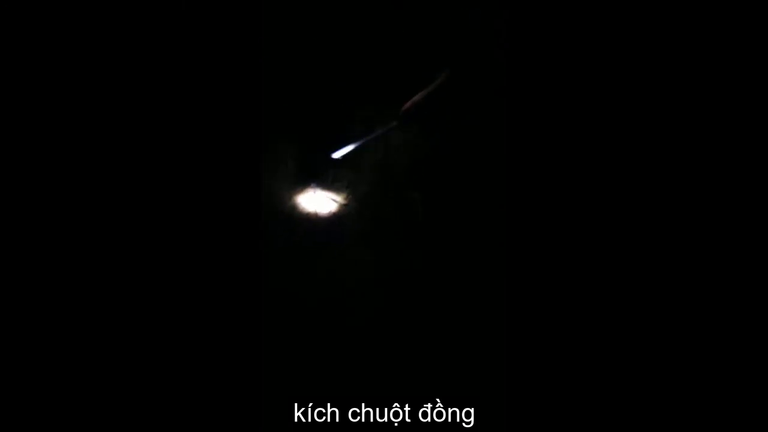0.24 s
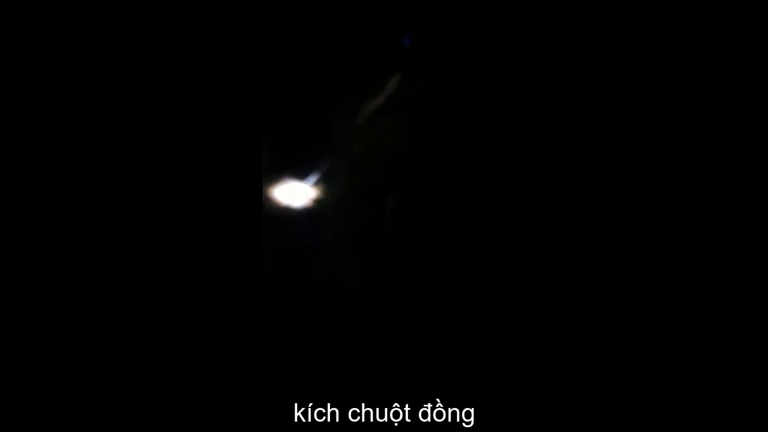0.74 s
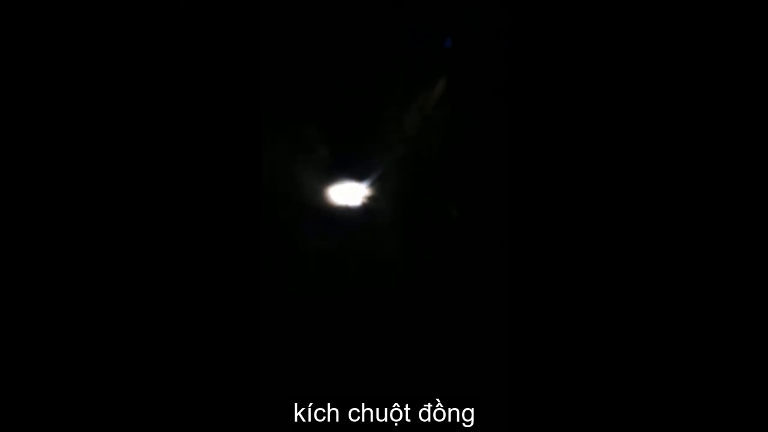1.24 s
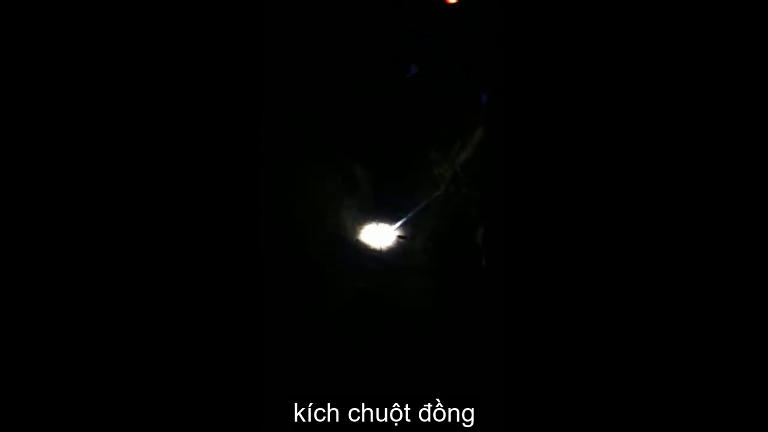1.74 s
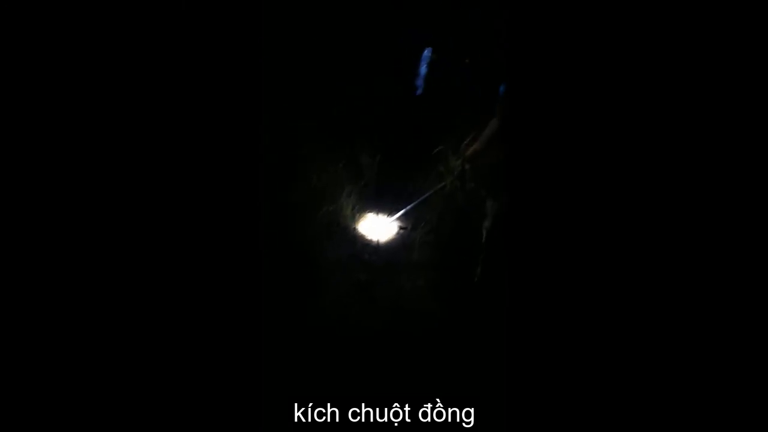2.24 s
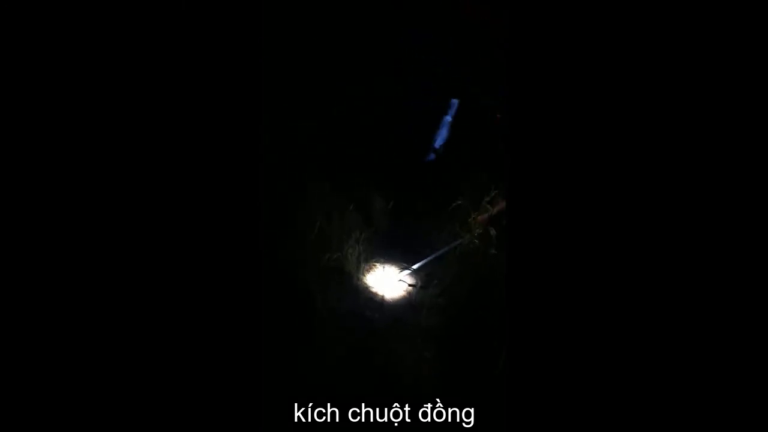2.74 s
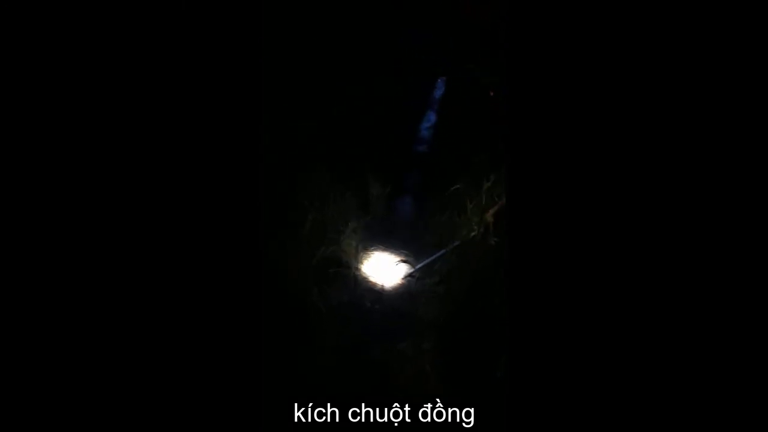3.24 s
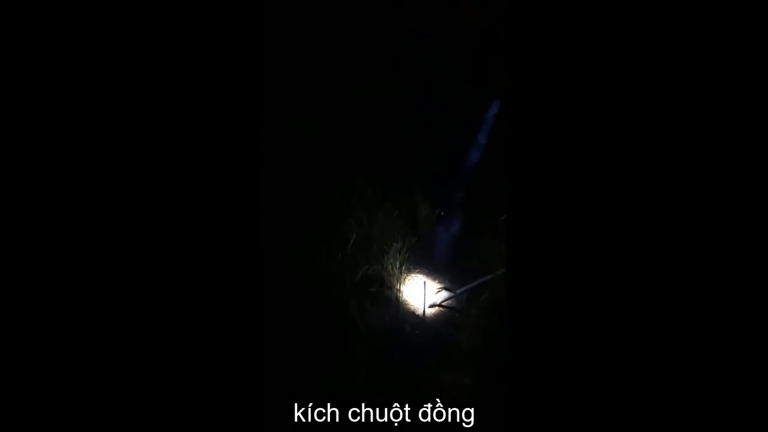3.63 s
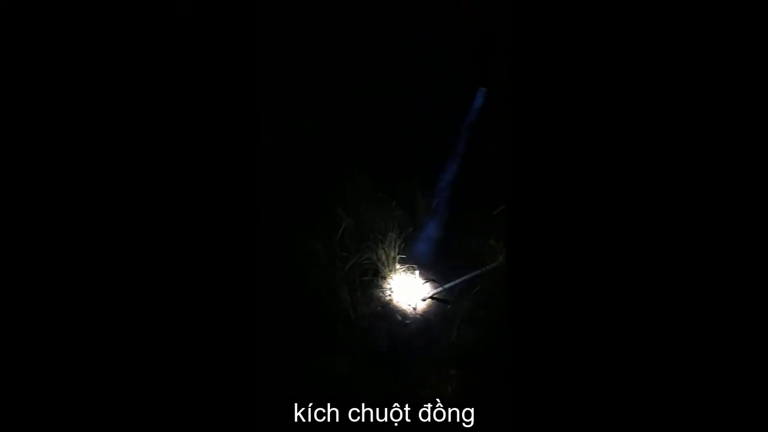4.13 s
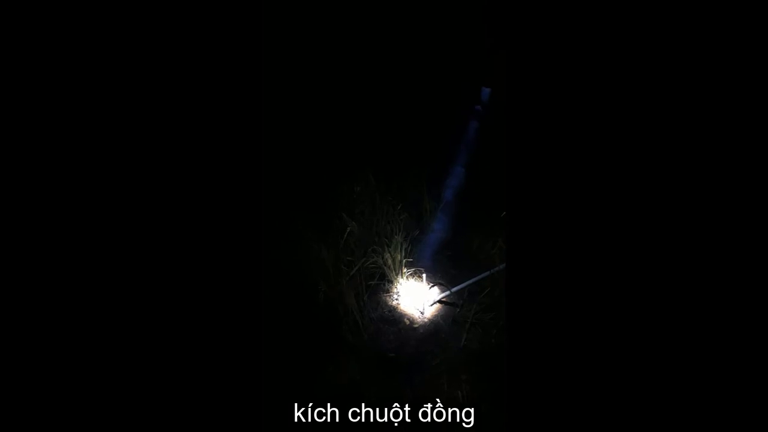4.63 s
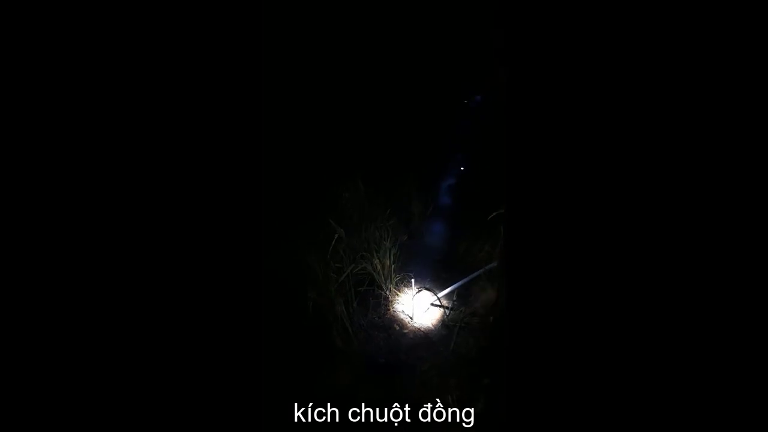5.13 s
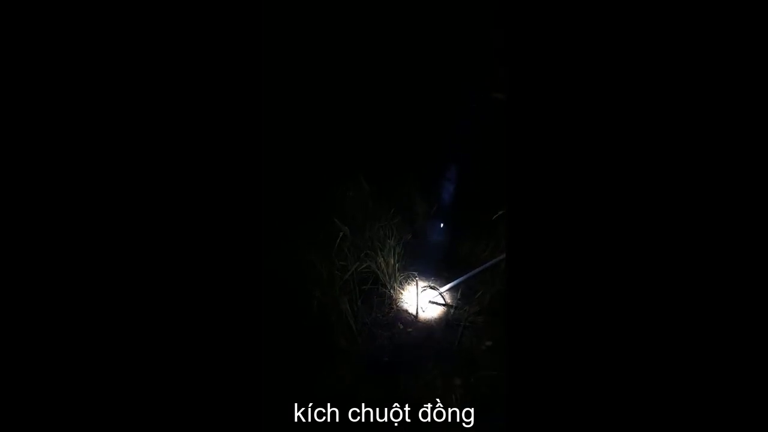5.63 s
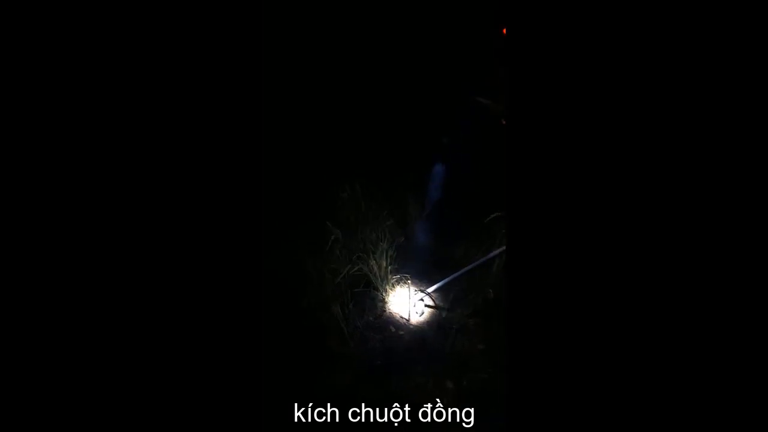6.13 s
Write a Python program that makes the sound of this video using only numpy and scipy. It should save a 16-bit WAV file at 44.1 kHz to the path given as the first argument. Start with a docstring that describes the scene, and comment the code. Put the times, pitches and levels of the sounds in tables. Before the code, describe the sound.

In an open grassy field at night, grass swishes close to the microphone as someone pushes through, with hard woody knocks and dry snaps early on and soft soil scuffs. Insects hiss steadily, small frogs rattle about five times a second and a distant engine hums faintly. Later the frogs grow clearer, and a small rodent gives one sharp, rasping squeak near the end.

```python
"""A grassy field at night. Close by, grass swishes, ticks and snaps as someone pushes through; the ground scuffs.
Near the end a small rodent gives one sharp, rasping squeak. Small frogs rattle five times a second.
A far insect chorus hisses, thin whistles curl and a distant engine hums.
Grass and soil are noise and random slips under movement envelopes; snaps and knocks are short bursts through
resonators; animals are harmonics, pulse trains and gliding sines; insects, engine and air are shaped noise."""
import sys
import numpy as np
from scipy import signal
from scipy.fft import rfft, irfft, next_fast_len
from scipy.io import wavfile
from scipy.ndimage import uniform_filter1d

SR = 44100
rng = np.random.default_rng(int(sys.argv[2]) if len(sys.argv) > 2 else 0)


def transcribe(signal):
    """Save signal, clipped to [-1, 1], as a 16-bit WAV file at the path in sys.argv[1]."""
    frames = np.atleast_2d(signal).T
    limited = np.clip(frames, -1, 1)
    pcm = np.round(limited * 32767).astype(np.int16)
    wavfile.write(sys.argv[1], SR, pcm)


N = 281029
TIME_S = np.arange(N) / SR

# Event levels are before each function's gain_db.
# Strides and smaller brushes; rise and fall span 10 dB:
# full_strength_s, hold_s, level_db, rise_s, fall_s, extra_body_db, extra_sheen_db
SWEEPS = [(0.0, .18, -35.3, .1, .7, 0, 1), (0.378, .008, -35.5, .03, .04, -4, 0),
          (0.45, .15, -46.5, .05, .15, -1, 10), (0.745, .05, -38.5, .03, .1, -2, 4),
          (0.92, .11, -31.8, .22, .115, 0, 0), (1.22, .1, -46, .04, .1, 4, 6),
          (1.5, .07, -45.3, .1, .1, 4, 4), (1.7, .15, -49, .1, .1, 3, -6),
          (1.99, .16, -42.3, .14, .1, 2, 3), (2.205, .01, -31.7, .05, .25, -4, -1),
          (2.34, .03, -42, .05, .08, 3, 2), (2.47, .03, -40, .05, .13, 1, 1),
          (2.68, .26, -49, .15, .15, 4, -2), (3.19, .06, -35.8, .18, .13, -2, 4),
          (3.4, .005, -36, .12, .14, -2.5, 2), (4.58, .035, -35.5, .085, .06, -7, -4),
          (4.72, .22, -48, .05, .2, 1, -8), (5.055, .005, -41, .05, .025, 2, -6),
          (5.33, .33, -36.7, .32, .16, -.5, -.5), (5.53, .06, -38, .04, .07, -3, -1),
          (5.85, .5, -43.5, .1, .1, -2, -3.5), (6.31, .06, -46, .04, .05, 4, -3)]
# Feet scuffing the ground: full_strength_s, hold_s, level_db, rise_s, fall_s, lowpass_hz
SCUFFS = [(0.1, .06, -62, .03, .05, 1200), (0.47, .02, -63, .03, .04, 2000), (0.9, .1, -68, .15, .06, 3000),
          (2.0, .15, -72, .2, .05, 3000), (2.22, .12, -66, .03, .05, 2000),
          (2.412, .035, -55, .005, .04, 2000), (3.17, .25, -68, .15, .06, 3000),
          (3.625, .15, -62.5, .02, .05, 750), (3.895, .005, -68, .015, .06, 800),
          (4.708, .012, -53.5, .008, .025, 4000), (4.838, .065, -58, .025, .025, 3500),
          (4.942, .06, -56.5, .02, .012, 2500), (5.048, .03, -55.5, .025, .012, 6000),
          (5.32, .06, -62.5, .12, .1, 1500), (5.58, .06, -62, .04, .06, 2000),
          (6.31, .005, -64, .012, .025, 800)]
# Thick stalks and clods breaking: start_s, peak_db, pitch_hz, ring_width_hz
KNOCKS = [(0.225, -19.5, 1320, 400), (0.596, -15.8, 1300, 270), (0.7275, -23.5, 1680, 400),
          (1.551, -35, 1300, 1500), (2.400, -35, 1100, 900), (2.4078, -20, 1270, 650),
          (2.4083, -30, 600, 500), (2.4312, -30, 1200, 1400), (2.4455, -36, 1150, 900),
          (2.4705, -39, 1250, 900), (2.9375, -31, 1650, 600), (2.96, -42, 1550, 600),
          (3.253, -36, 1300, 500), (3.266, -38, 1550, 500), (3.28, -31, 1350, 800), (3.288, -37, 1450, 500),
          (3.421, -35, 1100, 1100), (3.512, -34, 2200, 1100), (3.541, -36, 1300, 1200),
          (3.621, -45, 540, 330), (3.653, -44, 500, 330), (3.765, -50, 520, 330), (4.701, -34, 1900, 700),
          (4.7095, -37, 1100, 1400), (4.7155, -36, 1400, 1600), (4.807, -41, 1700, 600),
          (4.84, -36, 2210, 350), (4.867, -38, 2210, 500), (4.889, -39, 1140, 600), (4.935, -40, 2200, 900),
          (5.025, -39, 1480, 700), (5.055, -31, 1750, 900), (5.059, -32, 1450, 1300),
          (5.359, -45, 650, 330), (5.593, -45, 580, 330)]
# Loudest dry blades snapping: start_s, first_millisecond_db, pitch_hz, splinter_s, lowpass_hz
SNAPS = [(0.034, -19, 7200, .001, 9000), (0.226, -26.5, 4200, .002, 8000), (0.5965, -33, 3500, .001, 8000),
         (0.728, -30, 3000, .002, 9000), (1.552, -36, 3000, .002, 6000), (2.208, -26, 7200, .005, 14000),
         (2.401, -29, 4800, .002, 14000), (2.4087, -22, 3500, .004, 15000),
         (2.409, -27, 12500, .002, 16000), (2.427, -28, 4900, .001, 14000), (2.432, -32, 2900, .003, 12000),
         (2.473, -29, 4700, .001, 14000), (2.722, -38, 13000, .002, 15000), (3.409, -27, 7300, .002, 12000),
         (3.4975, -26, 7400, .001, 10000), (3.541, -34, 4000, .002, 9000), (4.256, -27.5, 6500, .002, 8000),
         (4.6995, -30, 3600, .007, 7500), (5.059, -26, 5000, .01, 8000), (5.304, -28, 5800, .001, 9000),
         (5.419, -26, 6000, .002, 14000), (5.442, -29, 6500, .001, 9000), (5.509, -23, 6600, .001, 11000),
         (5.838, -27, 6800, .001, 11000), (5.920, -20, 7600, .001, 17000)]
# Notes of the rodent's squeak: start_s, length_s, top_pitch_hz, level_db, roughness_share
SQUEAK = [(6.041, .029, 1900, -18.6, 1), (6.0705, .0495, 2252, -13.8, .05), (6.123, .015, 2600, -31, .2)]
# Thin peeps of a second animal: start_s, length_s, top_pitch_hz, level_db, roughness_share
PEEPS = [(5.635, .029, 2335, -33, .1), (5.667, .024, 2320, -35, .1)]
# Calls of the nearer frogs: start_s, length_s, level_db, base_pulses_per_s,
# extra_start_rate_share, extra_arch_rate_share, sac_hz, sac_width_hz
CROAKS = [(1.225, .07, -45.5, 422, -.05, -.03, 3650, 450), (1.452, .06, -43.5, 408, .03, .01, 3880, 500),
          (1.658, .062, -41, 408, .04, .005, 3920, 400), (1.856, .062, -42.5, 408, .04, .01, 3930, 400),
          (2.062, .06, -42.5, 406, .02, .005, 3900, 400), (2.26, .055, -41, 400, .03, .01, 3850, 450),
          (2.465, .055, -43, 408, .03, .01, 3920, 500), (2.662, .064, -45, 400, .04, .015, 3850, 450),
          (2.873, .064, -42.5, 394, -.02, .015, 3770, 450), (3.11, .05, -46, 412, 0, .01, 3700, 400),
          (3.33, .05, -45, 414, 0, .01, 3750, 350), (3.57, .06, -47.5, 394, .05, .03, 3620, 400),
          (4.01, .05, -52, 415, 0, .01, 3780, 400), (4.821, .018, -38, 425, 0, 0, 3850, 350),
          (5.007, .062, -36.8, 367, -.01, .01, 3880, 300), (5.211, .069, -33.8, 361, -.03, .02, 3880, 300),
          (5.413, .068, -33.6, 357, -.05, .065, 3860, 320), (5.617, .068, -33.2, 353, .02, .06, 3900, 280),
          (5.817, .069, -34.3, 346, .025, .055, 3880, 280), (6.024, .067, -36, 350, .01, .03, 3880, 280),
          (6.236, .018, -38.5, 358, 0, 0, 3885, 280), (6.264, .072, -40, 350, .01, .03, 3885, 280)]
# Far singers' dipping whistles: start_s, length_s, lowest_pitch_hz, level_db
WHISTLES = [(0.0, .09, 3150, -49), (0.13, .08, 3020, -48), (0.23, .1, 3060, -47), (0.35, .08, 3080, -50),
            (0.47, .07, 3100, -50), (0.575, .07, 3160, -45.5), (0.645, .08, 2980, -49),
            (1.1, .12, 2930, -51), (1.215, .075, 3170, -48), (1.23, .08, 2980, -51), (1.36, .11, 2940, -50),
            (1.44, .09, 3030, -50), (1.585, .09, 2920, -51), (1.65, .07, 3080, -51),
            (1.825, .125, 2930, -50), (1.86, .07, 3130, -51), (2.075, .055, 3050, -48)]
# Insect chorus bands: centre_hz, width_hz, level_db
INSECTS = [(2200, 370, -65), (3190, 480, -56), (3530, 560, -54), (4300, 790, -55.5), (7500, 690, -57),
           (8020, 603, -57)]
# Far engine bands: centre_hz, width_hz, level_db
ENGINE = [(46, 16, -73.5), (79.4, 6.1, -62.5), (99.4, 11, -68), (125, 9.5, -67), (149, 8.7, -71.5),
          (172.2, 11, -76)]
# Spectrum of the grass swish: frequency_hz, relative_db_per_hz
GRASS_SPECTRUM = [(290, -42), (500, -24), (658, -23), (986, -23), (1320, -13.5), (1860, -14), (2910, -8),
                  (3830, -5.5), (5420, 0), (6270, -3.5), (7350, 2), (7900, -0.5), (10100, -18.5),
                  (14100, -8), (15800, -12)]
# Spectrum of crunching soil: frequency_hz, relative_db_per_hz
GROUND_SPECTRUM = [(130, -34), (220, -7), (350, -1), (550, 0), (900, -1.5), (1400, -2), (1900, -5.5),
                   (2600, -8), (4000, -20), (8000, -55)]
# Spectrum of the squeak's mouth: frequency_hz, relative_db
SQUEAK_MOUTH = [(1200, -27), (2200, -25.5), (3300, -15), (4500, -5.5), (5100, 5.5), (6700, 1.5),
                (7700, -5.5), (9000, -11), (10000, -23), (11300, -34), (13000, -50)]
# Spectrum of the peeping throat: frequency_hz, relative_db
PEEP_THROAT = [(2300, -11.5), (4600, 3), (7000, -20), (10000, -45)]
# Spectrum of the night air: frequency_hz, relative_db_per_hz
NIGHT_AIR = [(25, -24), (40, -2), (150, -1), (220, 0.5), (500, -4.5), (950, -9.5), (1450, 4.5), (1850, -4),
             (2600, -0.5), (4000, 9), (6300, -1), (8300, 5), (9500, -16), (15800, -13)]
# Likeness of left and right: frequency_hz, likeness_share
LIKENESS = [(100, 1), (7000, 1), (8500, 1), (10500, 0.42), (16000, 0.72)]

CUTOFF_HZ = 15850
REST_DB = -55.3   # the blades never quite settle
CREST_SHARE = .52   # a note is highest, loudest and cleanest this far through
NOTE_RISE_DB, NOTE_FALL_DB = 7, 14
ARCH_AT_SHARE, ARCH_WIDTH_SHARE = .44, .17   # place and width of the rate arch within a call
STUTTER_SHARE, SETTLE_S = .03, .014   # first pulses come unevenly, then settle


def grass(brush, body, sheen, gain_db=1.2, flutter_db=.7, body_hz=3600, bright_hz=11500, bright_per_db=.26):
    """Blades slide past each other, brighter when brushed harder; thick ones add body, dry ones sheen."""
    mid, side = [coloured(friction(slips_per_s=1800, spread_db=2.2, smooth=1.7), GRASS_SPECTRUM)
                 for _ in range(2)]
    rub = widen(mid, side)
    low = filtered(rub, lambda hz: 1 / (1 + (hz / body_hz) ** 6))
    top = filtered(rub, lambda hz: 1 / (1 + (bright_hz / hz) ** 12))
    middle = rub - low - top
    brush_db = 20 * np.log10(brush)
    brighter = from_db(bright_per_db * np.clip(brush_db + 38, -10, 5))
    swish = low * body + middle * brush + top * sheen * brighter
    return swish * from_db(gain_db + flutter_db * drift(22))


def brushing():
    """Brushing strength as gains of swish, body and sheen; sweeps add in power."""
    power = 0
    for *movement, body_db, sheen_db in SWEEPS:
        power = power + (stroke(*movement) * from_db([[0], [body_db], [sheen_db]])) ** 2
    return np.sqrt(from_db(REST_DB) ** 2 + power)


def stroke(full_s, hold_s, level_db, rise_s, fall_s):
    """Gain of one movement: it swells, holds and dies away."""
    before = np.maximum(full_s - TIME_S, 0) / rise_s
    after = np.maximum(TIME_S - full_s - hold_s, 0) / fall_s
    return from_db(level_db - 10 * np.minimum(before + after, 10))


def friction(slips_per_s, spread_db, smooth):
    """Countless tiny slips of uneven size over a smooth rub."""
    sizes = from_db(spread_db * np.minimum(rng.exponential(1, N), 5)) * rng.choice([-1, 1], N)
    chance = slips_per_s * from_db(3 * drift(25)) / SR
    slips = sizes * (rng.random(N) < chance)
    return rms_one(slips) + smooth * rng.standard_normal(N)


def snaps(rows, gain_db=0.3, width_hz=3000, tail_db=-14, hollow_hz=10300, hollow_width_hz=4000):
    """A dry blade cracks: its fibres part within about a millisecond, then splinter briefly."""
    out, t = np.zeros(N), TIME_S[:SR // 20]
    tearing = np.exp(-(t / .0008) ** 2)
    for start_s, level_db, pitch_hz, splinter_s, lowpass_hz in rows:
        splintering = from_db(tail_db) * np.exp(-t / splinter_s)
        fibres = rng.choice([-1, 1], len(t)) * (tearing + splintering)
        snap = resonate(fibres, pitch_hz, width_hz)
        snap = butter(snap, 3, .55 * pitch_hz, "high")
        snap = snap - .85 * resonate(snap, hollow_hz, hollow_width_hz)   # a hollow in the treble
        snap = butter(snap, 5, min(lowpass_hz, .45 * SR))
        first_ms = np.std(snap[:44])
        add(out, start_s + .0007, snap / first_ms * from_db(level_db + gain_db))
    return out


def small_snaps(brush, count=12, over_db=6, spread_db=1.5, pitch_hz=6200, splinter_s=.0015, lowpass_hz=11000):
    """Thin blades give way at random, more often and louder when brushed harder; rows as in SNAPS."""
    chance = np.cumsum(np.sqrt(brush))
    at = np.searchsorted(chance, rng.random(count) * chance[-1])
    rows = []
    for i, (loud, high) in zip(at, rng.standard_normal((count, 2))):
        level_db = 20 * np.log10(brush[i]) + over_db + spread_db * loud
        rows.append((TIME_S[i], level_db, pitch_hz * 2 ** (.2 * high), splinter_s, lowpass_hz))
    return rows


def knocks(gain_db=0.7, top_ratio=1.5, thud_hz=620, thud_width_hz=520, thud_db=-19, tail_db=-32, tail_s=.005):
    """A stalk or clod gives way with a jolt that rings for a few cycles and thuds into the soil."""
    out, t = np.zeros(N), TIME_S[:SR // 20]
    for start_s, peak_db, pitch_hz, width_hz in KNOCKS:
        jolt = (t == 0) + from_db(tail_db) * rng.standard_normal(len(t)) * np.exp(-t / tail_s)
        weight = np.clip((peak_db + 23) / 5, 0, 1.2)   # only the heavy ones shake the soil
        thud = from_db(thud_db) * weight * resonate(jolt, thud_hz, thud_width_hz)
        ring = resonate(resonate(jolt, pitch_hz, width_hz), pitch_hz, .9 * pitch_hz)
        knock = butter(ring - thud, 5, top_ratio * pitch_hz)
        add(out, start_s + .0008, knock / np.abs(knock).max() * from_db(peak_db + gain_db))
    return out


def ground(brush, gain_db=5.0, litter_db=-37, lumpy_db=1.6):
    """Crumbs of soil and litter crunch dully in lumps: under each foot, and faintly with every sweep."""
    crumbs = friction(slips_per_s=1200, spread_db=2.4, smooth=0.9)
    crunch = coloured(crumbs * from_db(lumpy_db * drift(60)), GROUND_SPECTRUM)
    out = crunch * brush * from_db(litter_db)
    for *movement, lowpass_hz in SCUFFS:
        out = out + stroke(*movement) * butter(crunch, 2, lowpass_hz)
    return out * from_db(gain_db)


def cry(pitch_hz, gain, rough, mouth, chaos):
    """A tiny larynx: clean harmonics that break into a rasp when the cycles turn irregular."""
    phase = 2 * np.pi * np.cumsum(pitch_hz * (1 + chaos * rough * drift(1100))) / SR
    harmonics = sum(np.sin(k * phase) for k in range(1, 6))
    voice = coloured(harmonics + .9 * rough * rng.standard_normal(N), mouth)
    local_power = np.abs(uniform_filter1d(voice ** 2, size=130))
    return gain * voice / np.sqrt(local_power + 1e-9)


def arches(notes, scoop, droop, rasp, clean_share=.35):
    """Pitch, gain and roughness of notes that scoop to a crest, droop after it and turn hoarse at both ends."""
    pitch_hz, gain, rough = np.full(N, 1.0 * notes[0][2]), np.zeros(N), np.zeros(N)
    for start_s, length_s, top_hz, level_db, top_rough in notes:
        on = (TIME_S >= start_s) & (TIME_S < start_s + length_s)
        share = (TIME_S[on] - start_s) / length_s
        before = np.maximum(1 - share / CREST_SHARE, 0)
        after = np.maximum(share - CREST_SHARE, 0) / (1 - CREST_SHARE)
        pitch_hz[on] = top_hz * (1 - scoop * before ** 2 - droop * after ** 2)
        gain[on] = from_db(level_db - NOTE_RISE_DB * before - NOTE_FALL_DB * after)
        rough[on] = top_rough + rasp * np.maximum(before + after - clean_share, 0)
    return pitch_hz, uniform_filter1d(gain, size=44), np.clip(rough, 0, 1)


def frogs(gain_db=-1.8, scatter_db=-11):
    """The nearer frogs call five times a second; scatter from the plants roughens their pulses."""
    out = np.zeros(N)
    for start_s, length_s, level_db, *voice in CROAKS:
        add(out, start_s, croak(length_s, *voice) * from_db(level_db + gain_db))
    return out + from_db(scatter_db) * field_scatter(out, decay_s=.008)


def croak(length_s, pulses_per_s, onset, arch, sac_hz, sac_width_hz, jitter=.005, uneven_db=.9,
          kick_db=1.8, kick_s=.006, release_s=.01, skin_width_hz=850):
    """Fast pulses ring the vocal sac: a hard, ragged start, then an arch in rate; rms 1 while it lasts."""
    t = TIME_S[:SR // 8]
    unsettled = np.exp(-t / SETTLE_S)
    bump = np.exp(-((t / length_s - ARCH_AT_SHARE) / ARCH_WIDTH_SHARE) ** 2)
    rate = pulses_per_s * (1 + onset * unsettled + arch * bump)
    pulse_index = (t * pulses_per_s).astype(int) % 128
    late, loud = rng.standard_normal((2, 128))[:, pulse_index]
    cycles = np.cumsum(rate * (1 + late * (jitter + STUTTER_SHARE * unsettled))) / SR - .5
    pulses = sum(np.cos(2 * np.pi * k * cycles) for k in range(5, 15))
    pulses = pulses * from_db(uneven_db * loud + kick_db * np.exp(-t / kick_s))
    release = np.clip((length_s - t) / release_s, 0, 1)
    sac = resonate(pulses * release, sac_hz, sac_width_hz)
    call = resonate(sac, sac_hz, skin_width_hz)
    return rms_one(call) * np.sqrt(length_s / t[-1])


def field_scatter(x, decay_s=0.033):
    """Plants and banks throw back a short, faint tail."""
    t = TIME_S[:SR // 5]
    echoes = rng.standard_normal(len(t)) * np.exp(-t / decay_s) * (t > .004)
    return signal.fftconvolve(x, echoes / np.linalg.norm(echoes))[:N]


def whistles(gain_db=0.0, lowest_share=.44, curl_hz_per_s2=110000, waver=.02, flutter_db=3.0, fade_s=.012,
             scatter_db=-1):
    """A thin, hoarse tone slides down to its lowest pitch and curls up again, broken up by the plants."""
    out, t = np.zeros(N), TIME_S[:SR // 6]
    unsteady, flutter = 1 + waver * drift(220), from_db(flutter_db * drift(120))
    for start_s, length_s, low_hz, level_db in WHISTLES:
        curl_hz = low_hz + curl_hz_per_s2 * (t - lowest_share * length_s) ** 2
        pitch_hz = curl_hz * unsteady[int(start_s * SR):][:len(t)]
        fade = np.clip(np.minimum(t, length_s - t) / fade_s, 0, 1)
        tone = np.sin(2 * np.pi * np.cumsum(pitch_hz) / SR)
        add(out, start_s, fade * from_db(level_db + gain_db) * tone)
    direct, scattered = out * flutter, from_db(scatter_db)
    return (direct + scattered * field_scatter(direct, decay_s=.012)) / np.hypot(1, scattered)


def far_frogs(level_db=-62.5, low_hz=3100, high_hz=3680, count=11, spread_db=1.2, onset=.03, arch=.04, detune=.04):
    """Many further off keep a similar rhythm, each on its own pitch; the plants blur them into a shimmer."""
    out = np.zeros(N)
    for sac_hz in np.geomspace(low_hz, high_hz, count):
        starts_s = rng.uniform(0, .2) - .4 + np.cumsum(rng.uniform(.17, .25, 36))
        for start_s, (loud, sharp) in zip(starts_s, rng.standard_normal((36, 2))):
            if 0 <= start_s < TIME_S[-1]:
                pulses_per_s = sac_hz / 9 * (1 + detune * sharp)
                call = croak(.07, pulses_per_s, onset, arch, sac_hz, sac_width_hz=380)
                add(out, start_s, call * from_db(level_db + spread_db * loud))
    return field_scatter(out, decay_s=.025)


def insects(shimmer_db=2.0):
    """Many far singers of each kind merge into a shimmering band."""
    return sum(from_db(db + shimmer_db * drift(30)) * band(hz, width_hz) for hz, width_hz, db in INSECTS)


def engine():
    """Only the lowest orders carry this far, blurred by the air."""
    return sum(from_db(db) * band(hz, width_hz) for hz, width_hz, db in ENGINE)


def night_air(level_db=-58):
    """Steady broadband noise of the open field."""
    mid, side = [coloured(rng.standard_normal(N), NIGHT_AIR) for _ in range(2)]
    return from_db(level_db) * widen(mid, side)


def from_db(db):
    """Decibels to gain."""
    return 10 ** (np.asarray(db) / 20)


def rms_one(x):
    """Scale to rms 1."""
    return x / np.sqrt(np.mean(x ** 2) + 1e-20)


def at_hz(points, hz):
    """Read a table along log frequency."""
    f_hz, value = np.transpose(points)
    return np.interp(np.log(hz), np.log(f_hz), value)


def filtered(x, gain):
    """Apply a gain given as a function of frequency."""
    size = next_fast_len(N, True)
    hz = np.maximum(np.fft.rfftfreq(size, 1 / SR), 1)
    return irfft(rfft(x, size) * gain(hz), size)[..., :N]


def coloured(x, spectrum):
    """Give a signal a spectrum; rms 1."""
    return rms_one(filtered(x, lambda hz: from_db(at_hz(spectrum, hz))))


def drift(rate_hz):
    """Random fluctuation, slower than about rate_hz, with spread 1."""
    return rms_one(filtered(rng.standard_normal(N), lambda hz: 1 / (1 + (hz / rate_hz) ** 4)))


def band(centre_hz, width_hz):
    """Noise in a steep-sided resonance; rms 1."""
    def gain(hz):
        return 1 / (1 + ((hz - centre_hz) / width_hz * 2) ** 4) ** .5
    return rms_one(filtered(rng.standard_normal(N), gain))


def resonate(x, hz, width_hz):
    """Two-pole resonance with gain 1 on top."""
    r = np.exp(-np.pi * width_hz / SR)
    zeros = np.array([1, 0, -1]) * (1 - r * r) / 2
    poles = [1, -2 * r * np.cos(2 * np.pi * hz / SR), r * r]
    return signal.lfilter(zeros, poles, x + 1e-18)


def butter(x, order, hz, kind="low"):
    """Butterworth low- or highpass."""
    return signal.sosfilt(signal.butter(order, hz, kind, fs=SR, output="sos"), x)


def add(out, start_s, sound):
    """Mix a sound in at a time."""
    start = int(np.clip(start_s * SR, 0, N - 1))
    out[start:start + len(sound)] += sound[:N - start]


def widen(mid, side):
    """Left and right, alike except in the top treble."""
    def side_gain(hz):
        alike = np.clip(at_hz(LIKENESS, hz), 0, 1)
        return np.sqrt((1 - alike) / (1 + alike))
    return mid + filtered(side, side_gain) * np.array([[1], [-1]])


def scene():
    """Near sounds with their scatter, over the steady night."""
    brush, body, sheen = brushing()
    squeak = cry(*arches(SQUEAK, scoop=.14, droop=.27, rasp=2.0), SQUEAK_MOUTH, chaos=.17)
    peeps = cry(*arches(PEEPS, scoop=.025, droop=.025, rasp=.1), PEEP_THROAT, chaos=.153)
    near = knocks() + snaps(SNAPS + small_snaps(brush)) + frogs() + squeak + peeps
    scatter = from_db(-27) * field_scatter(near)
    movement = grass(brush, body, sheen) + ground(brush)
    night = whistles() + far_frogs() + insects() + engine() + night_air()
    return near + scatter + movement + night


def record(dry):
    """Cut the top steeply with an elliptic lowpass."""
    return signal.sosfilt(signal.ellip(10, .1, 80, CUTOFF_HZ, fs=SR, output="sos"), dry)


dry = scene()
out = record(dry)
transcribe(out)
```